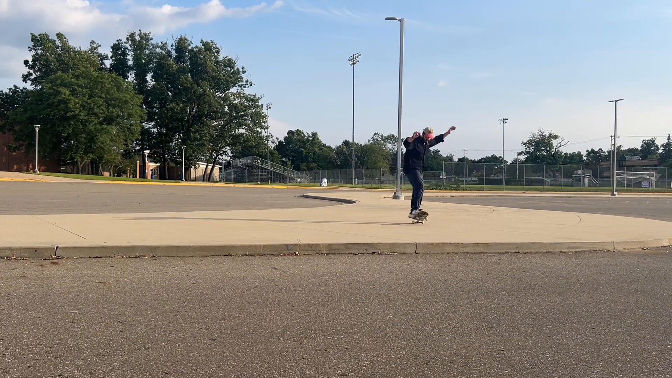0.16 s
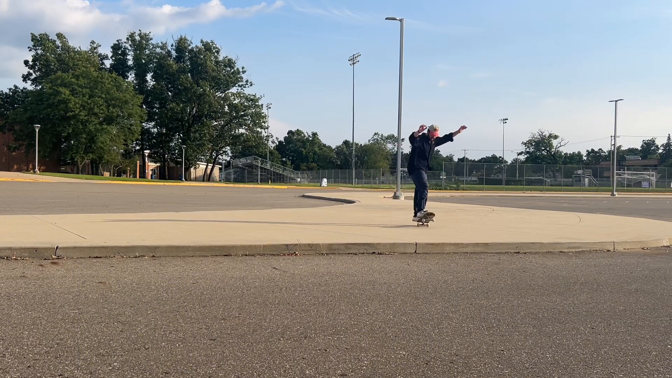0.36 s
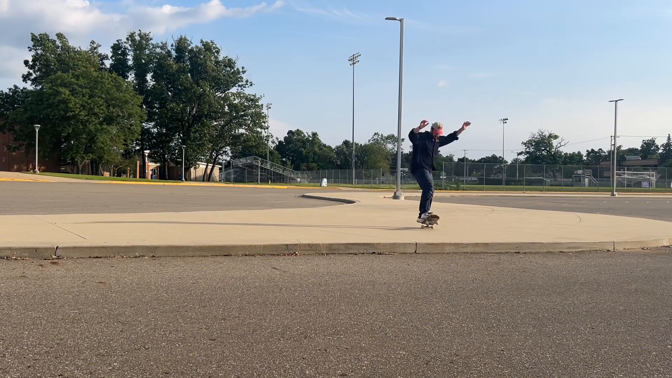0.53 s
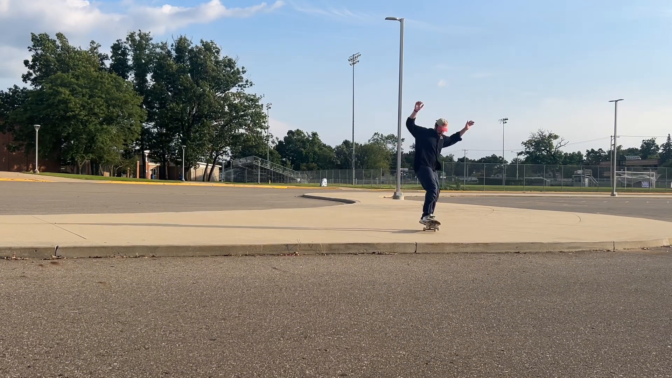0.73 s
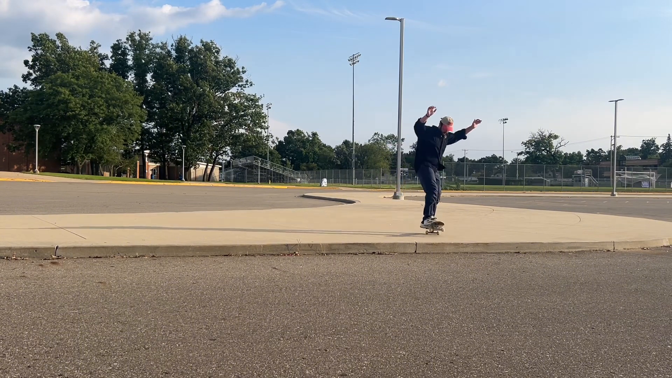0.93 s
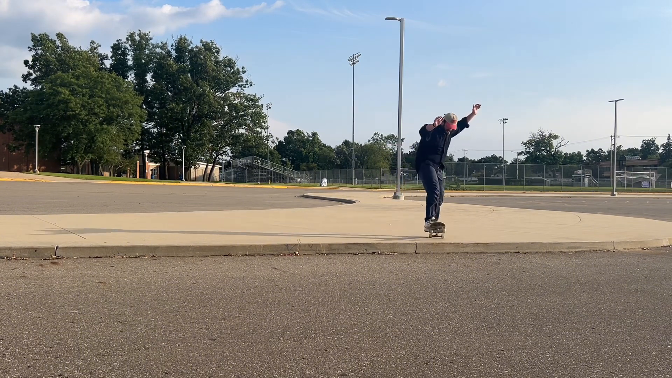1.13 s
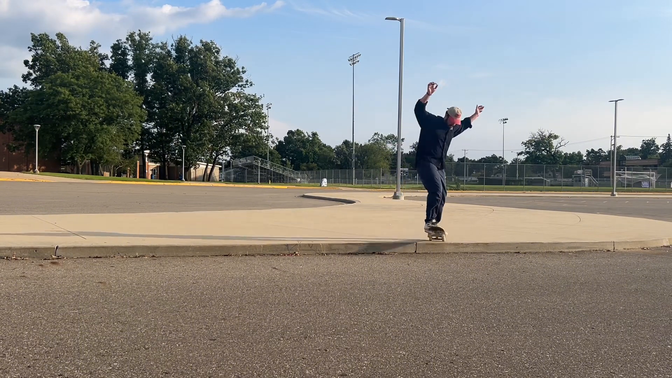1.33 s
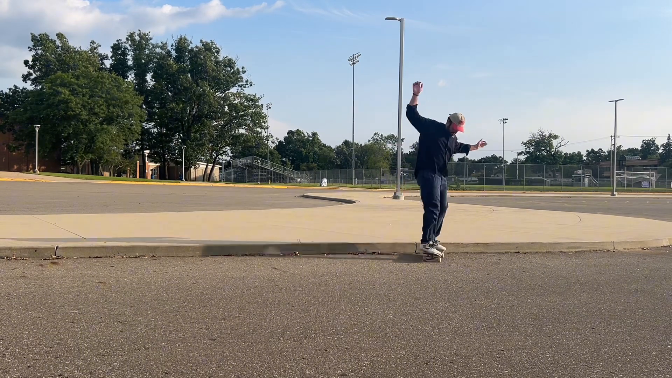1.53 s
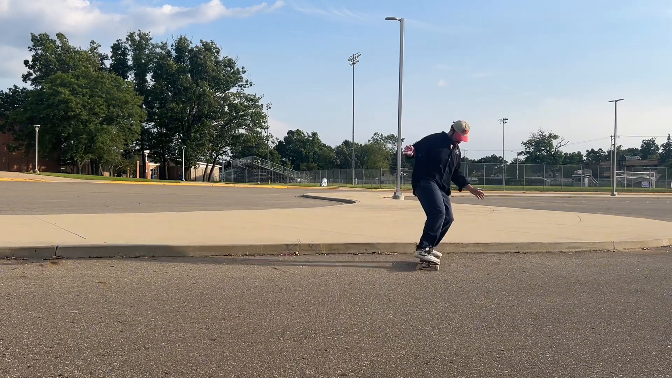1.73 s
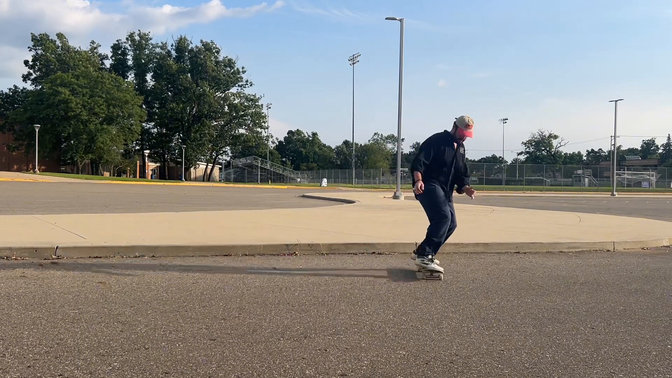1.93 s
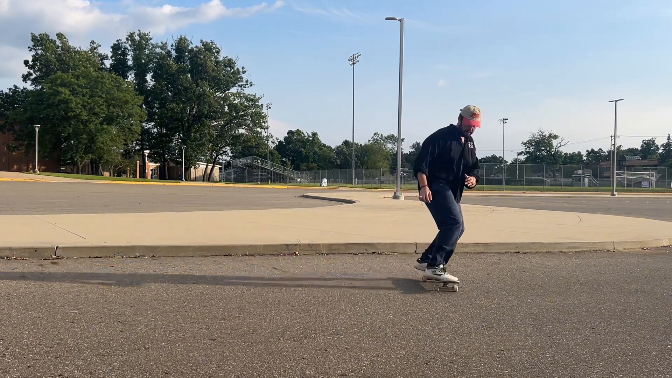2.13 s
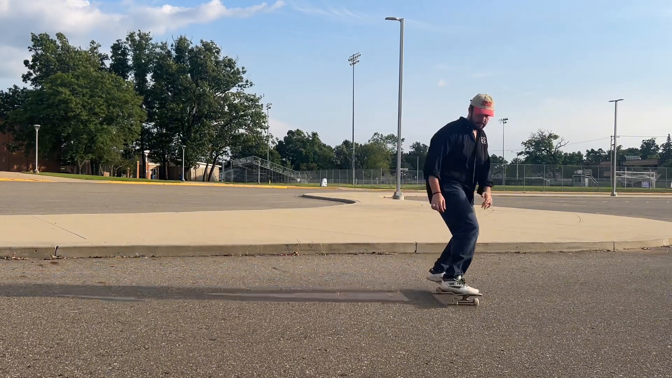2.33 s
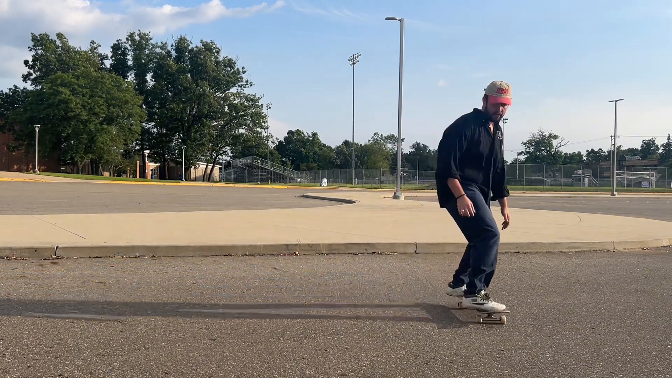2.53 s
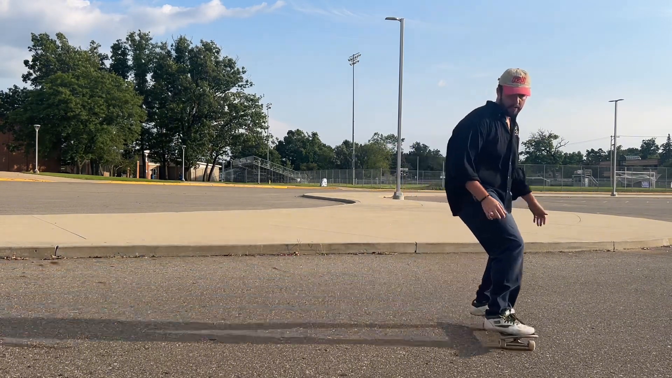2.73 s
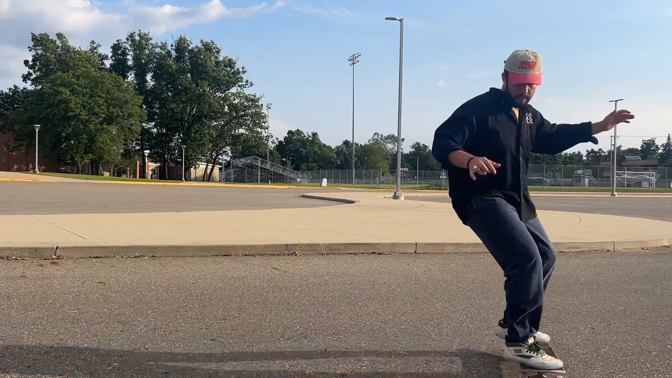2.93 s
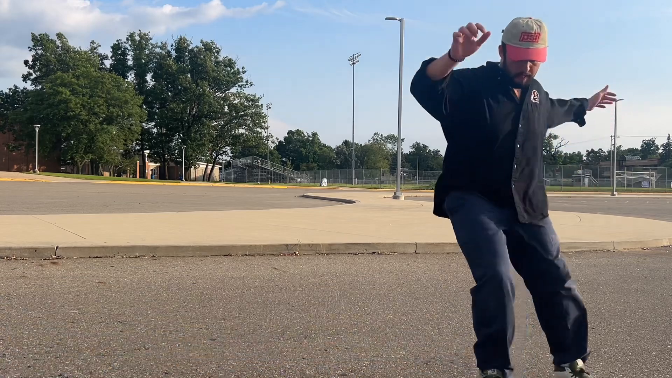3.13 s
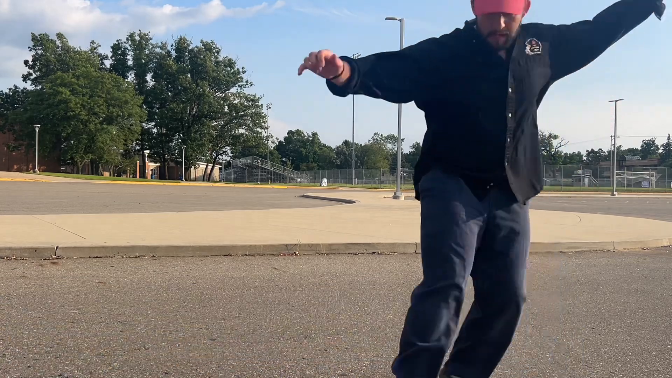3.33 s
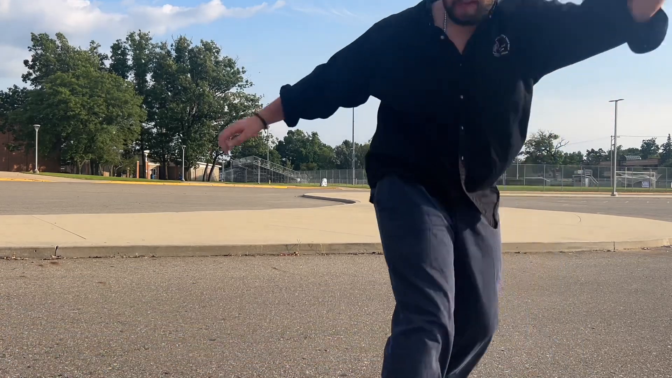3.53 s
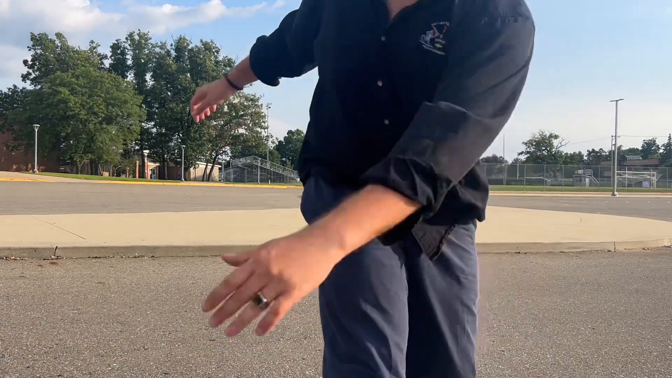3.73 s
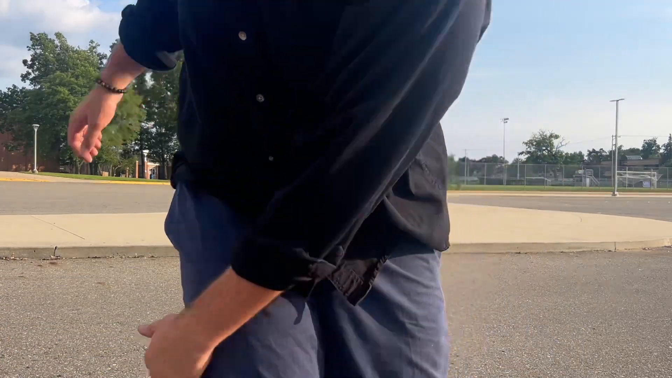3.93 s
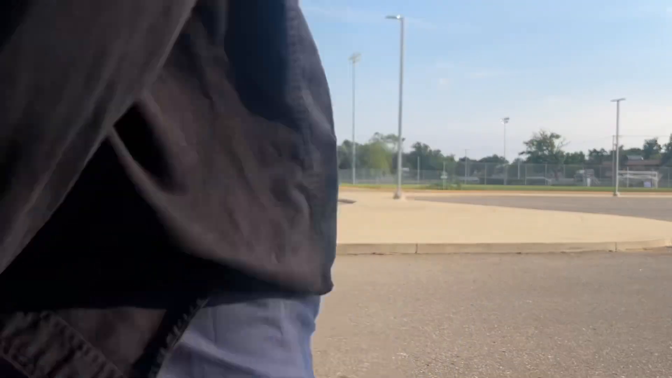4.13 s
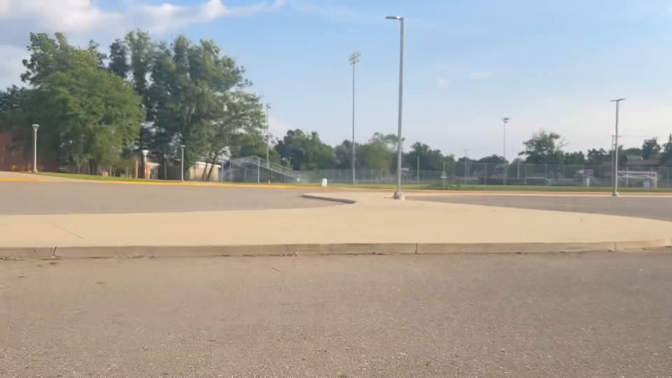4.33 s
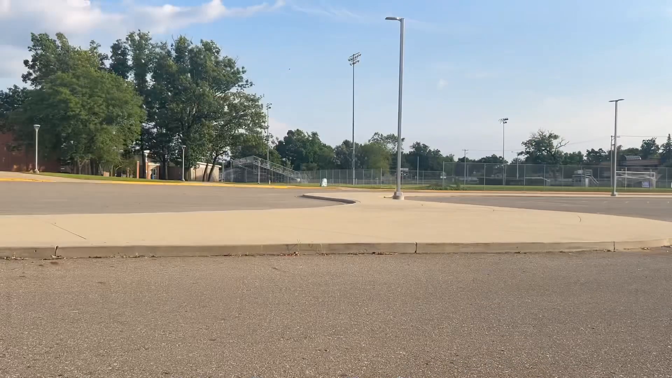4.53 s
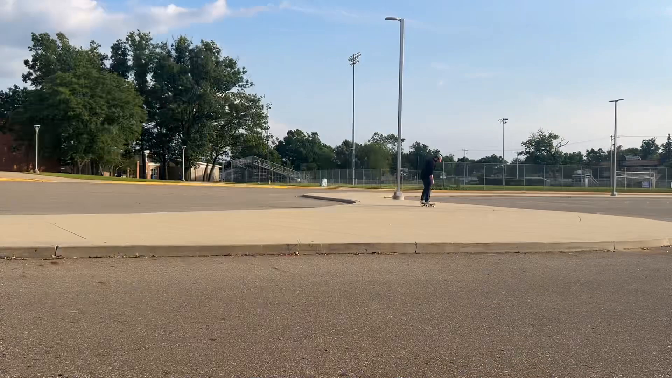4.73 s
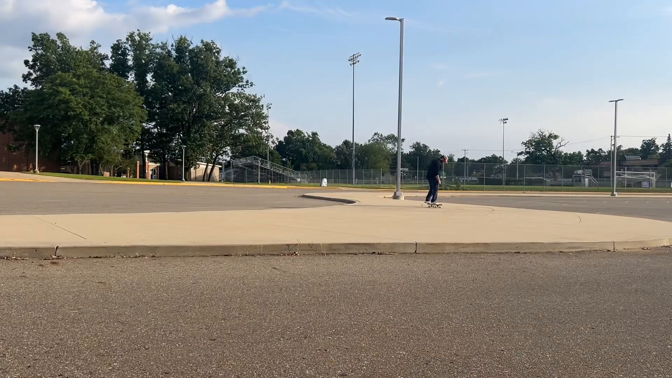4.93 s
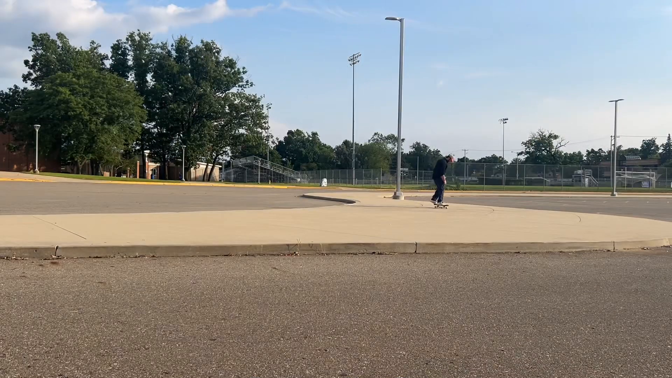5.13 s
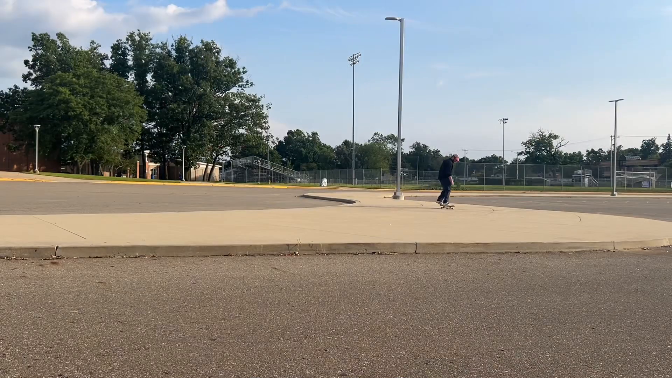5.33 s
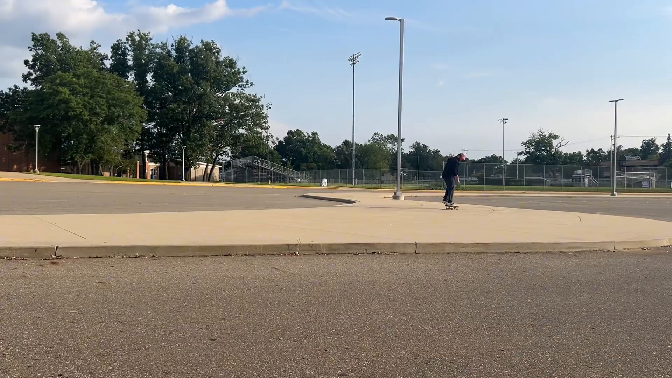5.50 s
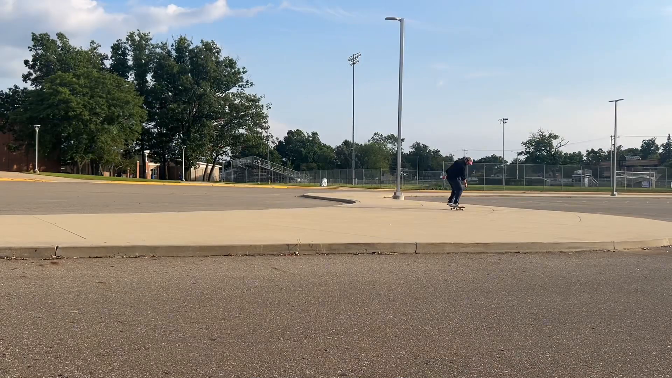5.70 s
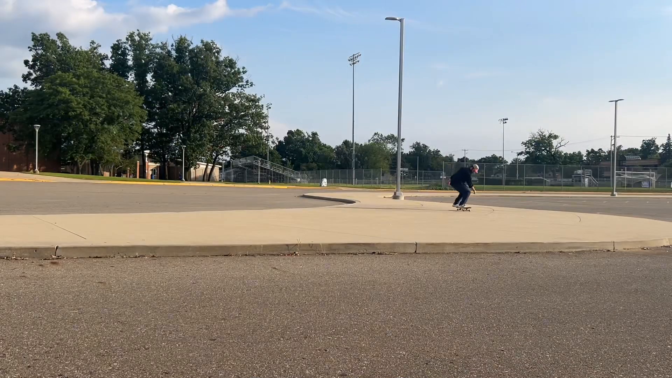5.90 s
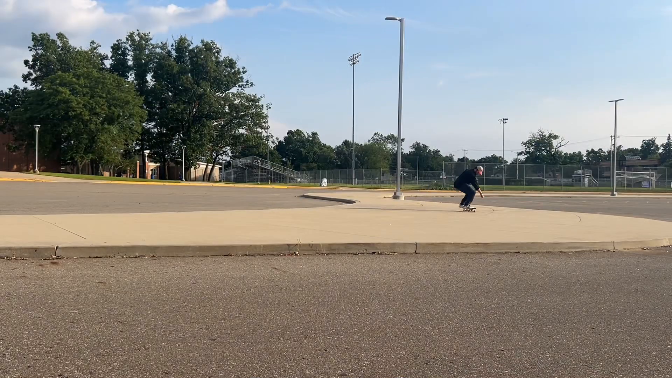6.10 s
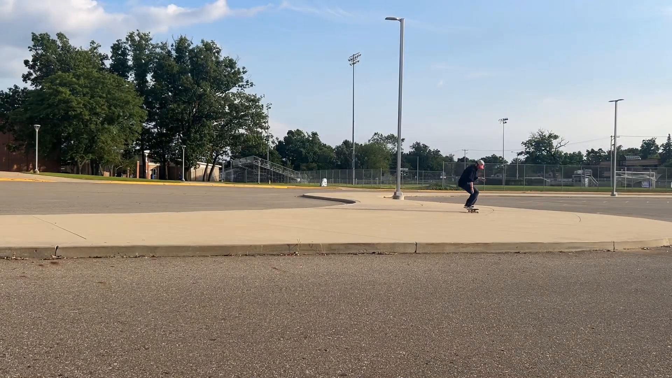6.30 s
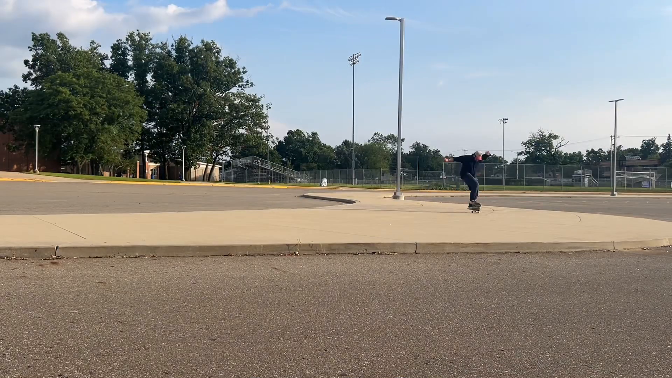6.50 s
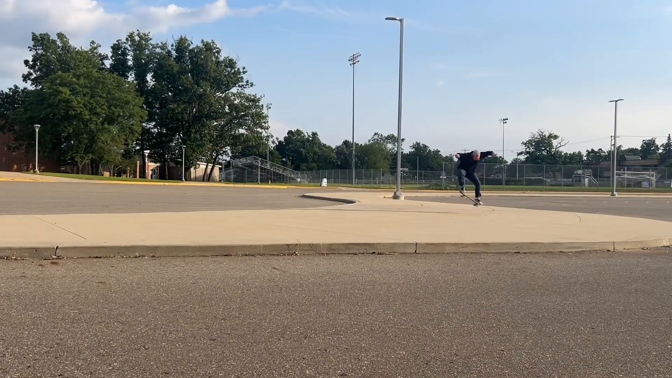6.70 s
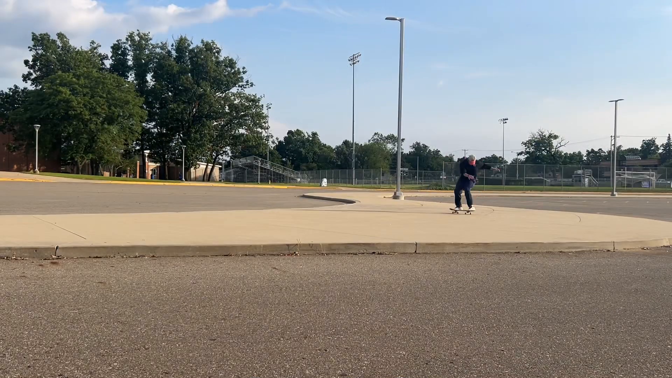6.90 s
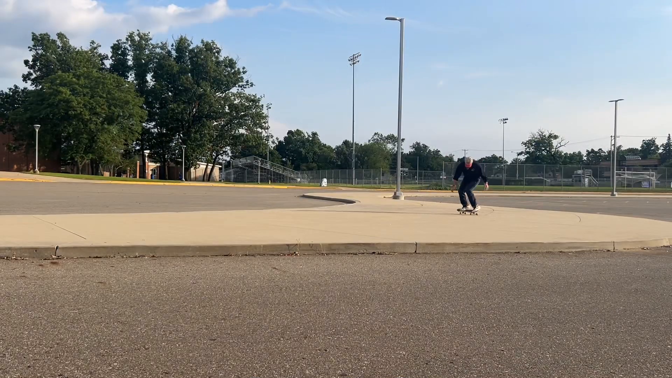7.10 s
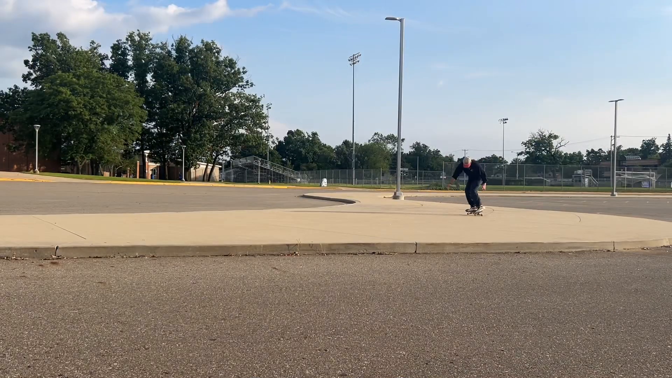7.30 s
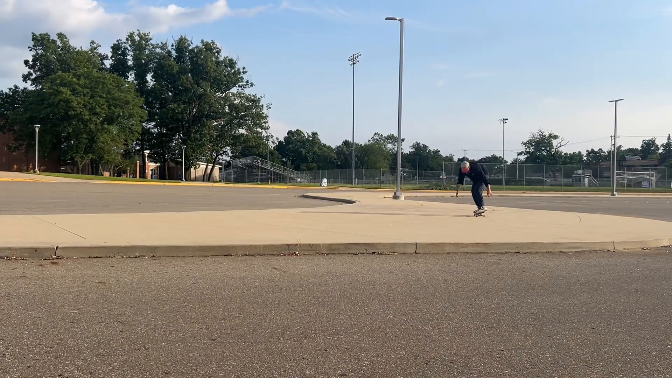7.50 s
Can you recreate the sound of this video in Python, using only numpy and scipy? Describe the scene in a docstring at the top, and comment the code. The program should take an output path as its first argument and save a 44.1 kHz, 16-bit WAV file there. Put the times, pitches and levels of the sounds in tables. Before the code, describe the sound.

An open car park with distant traffic hum, very faint insects and low gusts buffeting a fixed stereo microphone. From 0 s a skateboard rolls closer, a soft rumble with gritty hiss and dull thuds near 0.9 s. At about 1.5 s it drops off a kerb: a hard, hollow wooden crack in a tight cluster, with grinding grit. The rumble roughens and grows. From 2.94 to 3.19 s the wheels skid sideways, a harsh throbbing scrape with an unsteady squeal. Scuffs and board knocks follow at 3.2-3.45 s. Wheels swell to a deep, close rumble peaking around 4.2 s, with rustling, snapping cloth and tiny rattles. At 4.57 s a click cuts the close ride. Faint distant rolling remains under light wind; a wooden pop comes at 6.55 s, a stronger clattering landing at 6.83 s, then small ticks and quiet rolling until about 7.5 s.

```python
"""Throughout, wind buffets two microphone ports over a far traffic hum and a thin band of insects: shaped
noise. A skateboard rolls up over a car park (rumble and hiss), drops off a kerb (struck deck modes, grinding
grit) and skids sideways to brake (stick-slip partials, throbbing scrape). Shoes and tail scuff, then it rumbles
past, the rider's clothes rustling and snapping, until the scene cuts with a click to a far ride: it rolls,
pops, lands."""
import sys
import numpy as np
from scipy import signal
from scipy.fft import rfft, irfft, next_fast_len
from scipy.io import wavfile

SR = 44100
rng = np.random.default_rng(int(sys.argv[2]) if len(sys.argv) > 2 else 0)


def digitize_waveform(pressure):
    """Quantize a signal to 16-bit integers and store it at the path in sys.argv[1].

    Rows of a 2-D input are taken as channels; values are limited to [-1, 1].
    """
    field = np.atleast_2d(pressure).T
    bounded = np.clip(field, -1, 1)
    quanta = np.round(bounded * 32767).astype(np.int16)
    wavfile.write(sys.argv[1], SR, quanta)


N = 332955
SIZE = next_fast_len(N + 4096)
BINS = np.maximum(np.arange(SIZE // 2 + 1) * SR / SIZE, 1)  # Hz

# port pair, source ahead: (frequency [Hz], right lead [rad], left-right [dB], likeness [0-1])
AHEAD_PORTS = [(102.5, -0.49, 0, 0.73), (500, 1, 0.5, 1), (800, 0.6, -4.5, 0.82), (1560, 0.57, -0.5, 1),
               (1940, 0.086, 0.5, 1), (4370, 1, 0.5, 1), (5800, 1.4, 5, 0.41), (7530, 0.88, 3, 0.25)]
# port pair, source beside: (frequency [Hz], right lead [rad], left-right [dB], likeness [0-1])
BESIDE_PORTS = [(100, -.3, 0, .92), (500, -.9, 0, .88), (1000, -1.7, 1, .65), (1450, -3.2, 0, .7),
                (1850, -6.5, 0, .8), (3000, -7.4, 4, .6), (5000, -6.9, 1, .5), (6000, -5.6, 1, .5),
                (7500, -6.28, 0, .8)]
# bright part of a scrape: (frequency [Hz], level [dB])
BRIGHT_SCRAPE = [(1500, -11), (2300, -4.5), (3000, -5), (4200, -7.5), (6000, -5.5), (7500, -14),
                 (9500, -12.5), (12000, -9), (15000, -15)]
LEVEL_FROM_S, LEVEL_AT_S, GONE_S = 3.55, 3.97, 4.5743  # board draws level; the scene cuts to the far ride


def amp(db):
    """Decibels to gain."""
    return 10 ** (np.asarray(db) / 20)


def rms_one(x):
    """Scale to unit power."""
    return x / np.sqrt(np.mean(x ** 2) + 1e-20)


def in_time(rows):
    """Columns joined by straight lines; -200 outside the rows."""
    s, *columns = np.transpose(rows)
    return [np.interp(np.arange(N) / SR, s, c, -200, -200) for c in columns]


def between(values, start_s, end_s):
    """Glide from the first value to the second."""
    return np.interp(np.arange(N) / SR, [start_s, end_s], values)


def strokes(rows, rise_db_per_s, fall_db_per_s):
    """Level in dB of strokes that rise, hold and fall; the loudest counts."""
    t = np.arange(N) / SR
    levels_db = []
    for s, held_s, db in rows:
        early_s = np.maximum(s - t, 0)
        late_s = np.maximum(t - s - held_s, 0)
        levels_db.append(db - rise_db_per_s * early_s - fall_db_per_s * late_s)
    return np.max(levels_db, axis=0)


def at_hz(points, hz, column=1):
    """Read a table on a log-frequency axis."""
    table = np.array(points)
    return np.interp(np.log(hz), np.log(table[:, 0]), table[:, column])


def drift(rate_hz):
    """Slow chance of unit rms: noise through two equal poles, run at every 40th sample."""
    r = np.exp(-80 * np.pi * rate_hz / SR)
    noise = rng.standard_normal(N // 40 + 2002)
    slow = signal.lfilter([1], [1, -2 * r, r * r], noise)[2000:]  # settled part
    return np.interp(np.arange(N) / 40, np.arange(len(slow)), rms_one(slow))


def ring(force, hz, t60_s):
    """One decaying mode: a two-pole resonator."""
    r, w = amp(-60 / (t60_s * SR)), 2 * np.pi * hz / SR
    return signal.lfilter([0, np.sin(w)], [1, -2 * r * np.cos(w), r * r], force + 1e-18)


def rough_noise(flicker_db, rate_hz):
    """Two unrelated white noises that share a flickering level."""
    return rng.standard_normal((2, N)) * amp(flicker_db * drift(rate_hz))


def ports(pair, direction, gain=1):
    """Colour and place a sound: row one reaches both ports alike, row two makes them differ."""
    # high treble, same for every direction: (frequency [Hz], right lead [rad])
    treble_turn = [(7500, 0), (8600, 1.3), (9200, 3), (10700, 3.2), (11500, 5.2), (12400, 6.2),
                   (13900, 6.4), (15000, 9.4)]
    common, apart = rfft(pair, SIZE) * gain
    high = np.interp(BINS, [7500, 9200], [0, 1])
    last_rad = np.angle(np.exp(1j * direction[-1][1]))
    lead_rad = at_hz(direction, BINS) - last_rad * high + at_hz(treble_turn, BINS)
    lean = amp(at_hz(direction, BINS, column=2) / 2)
    alike = np.clip(at_hz(direction, BINS, column=3), 0, 1)
    alike = alike + high * (.995 - alike)
    shared, unlike = np.sqrt(1 + alike) * common, np.sqrt(1 - alike) * apart
    left = lean * (shared + unlike)
    right = (shared - unlike) * np.exp(1j * lead_rad) / lean
    return irfft(np.array([left, right]), SIZE)[:, :N] / np.sqrt(2)


def coloured(spectrum, direction, flicker_db, rate_hz, lift_db=0):
    """Placed noise of a given spectrum; the mean of the two ports has rms 1."""
    gain = amp(at_hz(spectrum, BINS) + lift_db)
    out = ports(rough_noise(flicker_db, rate_hz), direction, gain)
    return out / np.sqrt(np.mean(out.mean(axis=0) ** 2))


def distance():
    """Far traffic is smooth broadband noise; insects are noise through a narrow resonance."""
    # traffic: (frequency [Hz], level [dB])
    traffic_spectrum = [(30, -12.5), (60, -1.5), (150, -5.5), (300, -1.5), (450, -11), (700, -15.5),
                        (1000, -15.5), (1600, -18.5), (2200, -33), (3500, -36.5), (5500, -42), (7000, -47),
                        (9500, -53), (12500, -66), (15000, -68)]
    # port pair, sound from around: (frequency [Hz], right lead [rad], left-right [dB], likeness [0-1])
    around_ports = [(98, 1, 0.5, 1), (507, -0.14, 0, 0.47), (690, -3, 6.5, 0.0463), (797, -4.5, 4, 0.2),
                    (1520, -2.5, -2, 0.71), (1785, -6, 3.5, 0.88), (3350, -7.5, 1, 0.83),
                    (5400, 0, 4, 0.15), (7530, 4.5, -1.5, 0.25)]
    insects = rms_one(ring(rng.standard_normal(N), hz=6600, t60_s=0.005))
    traffic = coloured(traffic_spectrum, around_ports, flicker_db=.6, rate_hz=2.3)
    return amp(-45.5) * traffic + amp(-79.5) * insects * [[1.2], [.8]]


def wind():
    """Turbulence on the ports: lumpy low-frequency pressure noise."""
    # gusts: (time [s], level [dB])
    gusts = [(0.0, -32), (0.36, -31.5), (0.4, -31), (0.8, -29.5), (0.84, -35.5), (0.92, -25.5), (1.2, -31),
             (1.28, -29), (1.45, -30), (1.68, -25.5), (1.81, -29), (2.02, -26.5), (2.1, -31.5),
             (2.29, -29.5), (2.39, -42), (2.59, -37.5), (2.61, -42.5), (3.05, -34), (3.07, -63),
             (3.36, -64), (3.47, -28.5), (3.51, -43), (4.25, -42), (4.31, -50), (4.37, -29), (4.42, -33),
             (4.44, -24.5), (4.52, -41), (5.3, -53.5), (5.59, -38), (5.66, -42.5), (6.03, -37.5),
             (6.06, -45), (6.58, -37.5), (6.6, -41), (6.86, -46.5), (6.88, -37), (7.25, -40), (7.3, -35),
             (7.55, -43.5)]
    # gust spectrum: (frequency [Hz], level [dB])
    gust_spectrum = [(20, -27.5), (35, -1.5), (60, 5.5), (100, 2), (160, -3), (250, -8.5), (400, -25.5),
                     (800, -65)]
    return amp(in_time(gusts)[0]) * coloured(gust_spectrum, AHEAD_PORTS, flicker_db=2.5, rate_hz=20.)


def clothes():
    """Cloth rubs in clumps of noise; creases and grit snap in short bursts."""
    # rubs: (time [s], held [s], level [dB])
    rubs = [(0.02, 0.012, -75), (0.29, 0.061, -70), (0.9, .01, -73), (0.95, .19, -79), (1.4, .05, -78),
            (3.9, .65, -81), (4.03, 0.055, -54), (4.134, 0.0044, -60), (4.195, 0.055, -49.5),
            (4.29, 0.092, -68)]
    # louder snaps: (time [s], level [dB])
    loud_snaps = [(2.833, -36.5), (3.2484, -31.5), (3.2842, -44.5), (3.344, -40), (3.361, -34),
                  (3.3866, -35.5), (3.3972, -41), (3.423, -41.5), (3.433, -41), (3.4448, -37.5),
                  (3.927, -48), (4.019, -41), (4.025, -46), (4.0302, -29.5), (4.035, -33), (4.044, -38),
                  (4.049, -37), (4.0594, -37), (4.073, -33.5), (4.077, -41), (4.085, -32), (4.1238, -46),
                  (4.1333, -31), (4.1523, -42), (4.174, -41), (4.188, -42), (4.202, -32), (4.2138, -48),
                  (4.221, -42), (4.2305, -32), (4.245, -41), (4.2494, -36), (4.2911, -42), (4.3037, -51),
                  (4.31, -43), (4.3187, -33), (4.351, -44), (4.371, -42), (4.394, -39.5)]
    # cloth spectrum: (frequency [Hz], level [dB])
    cloth_spectrum = [(3000, -1.5), (4500, -27), (6000, 8.5), (7500, 1.5), (9500, 13.5), (12500, 2.5),
                      (15000, -2.5)]
    faint_from_s, faint_to_s, faint_db, faint_spread_db = 3.7, 4, -64, -1
    snap_rise_s, snap_fall_s = .0016, .0017

    rub_db = strokes(rubs, rise_db_per_s=497, fall_db_per_s=901)
    rub = amp(rub_db) * rough_noise(flicker_db=3.5, rate_hz=180.0)
    faint_snaps = []  # at random times
    for a, b in rng.random(size=(14, 2)):
        s = faint_from_s + a * (faint_to_s - faint_from_s)
        faint_snaps.append((s, faint_db + faint_spread_db * (2 * b - 1)))
    t = np.arange(440) / SR
    burst = np.minimum(t / snap_rise_s, 1) * np.exp(-t / snap_fall_s)
    snaps = np.zeros((2, N))
    for s, db in loud_snaps + faint_snaps:
        at = round(s * SR)
        snaps[0, at:at + 440] += amp(db) * rng.standard_normal(440) * burst

    cloth_db = at_hz(cloth_spectrum, BINS)
    octaves_below = np.maximum(np.log2(cloth_spectrum[0][0] / BINS), 0)
    rub_gain = amp(cloth_db - 8. * octaves_below)
    snap_gain = amp(3.0 + 0.45 * cloth_db - 3. * octaves_below)
    return ports(rub, BESIDE_PORTS, rub_gain) + ports(snaps, BESIDE_PORTS, snap_gain)


def thuds():
    """Wheel thuds and gust slaps: a soft push, a low ring that falls 60 dB in 4.25 cycles."""
    # pushes: (time [s], drive [dB], frequency [Hz])
    pushes = [(0.917, -9.5, 72), (0.967, -9.5, 68), (1.263, -13, 74), (1.498, -7.5, 298), (1.522, -6, 330),
              (1.534, -13, 111), (1.631, -10, 250), (1.652, -10.5, 211), (1.656, -5.5, 310),
              (1.666, -5.5, 53.7), (2.805, -9.5, 163.4), (2.904, -15, 199), (3.449, -13.5, 204),
              (4.436, -18.5, 100), (6.883, -18.5, 130), (7.013, -16, 194)]
    out = np.zeros(N)
    for s, db, hz in pushes:
        push = np.zeros(4096)
        push[0] = amp(db)
        soft = signal.lfilter([.05], [1, -.95], -ring(push, hz, 4.25 / hz))
        at = round(s * SR)
        out[at:at + 4096] += soft
    return out * np.ones((2, 1))


def scuffing():
    """Shoes and tail scuff the ground: strokes of bright, uneven scrape noise."""
    # scuffs: (time [s], held [s], level [dB])
    scuffs = [(3.18, 0.084, -49.5), (3.38, 0.0038, -34.5), (3.446, .002, -53)]
    scuff_db = strokes(scuffs, rise_db_per_s=429, fall_db_per_s=500)
    return amp(scuff_db) * coloured(BRIGHT_SCRAPE, AHEAD_PORTS, flicker_db=6.0, rate_hz=180.0)


def blows():
    """Each contact knocks the deck modes near the spot struck, then grinds briefly and keeps them shaking."""
    # board on ground: (time [s], grit level [dB], grind [s], grit tilt [dB/octave], knock level [dB],
    # centre of the deck's ring [Hz])
    contacts = [(1.488, -18, 0.0089, -3, -19, 3100), (1.4905, -35, .002, 10, -25, 3500),
                (1.4908, -33, 0.004, 6, -13.5, 1000), (1.494, -36, 0.0023, 4, -28, 3300),
                (1.498, -32, 0.016, -3.5, -18, 800), (1.5154, -21, 0.005, -1.5, -5.5, 1300),
                (1.5178, -26.5, 0.0018, 5, -27, 4600), (1.517, -40, 0.0018, 1, -12.5, 1290),
                (1.518, -29, 0.0091, -5.5, -12.5, 2800), (1.522, -48, 0.0068, -9, -14.5, 596),
                (1.541, -42, .006, 7, -16, 544), (1.528, -44, 0.016, -2.5, -33, 2100),
                (1.545, -48, .003, -7, -29, 2050), (1.555, -44, 0.025, -6, -35, 1500),
                (1.718, -63, .003, -5, -39, 2200), (3.253, -30, 0.0072, -4, -21.5, 1305),
                (3.383, -29.5, .015, -4.5, -33.5, 1120), (3.449, -34.5, 0.0037, -0.7, -19.5, 596),
                (3.735, -60, .003, 2, -48, 4240), (3.83, -63, 0.017, 2, -43, 3130),
                (3.927, -46.5, .002, 1.5, -48, 2260), (3.995, -63, .003, -5, -39.5, 2200),
                (4.022, -49, 0.0082, 5, -40, 2080), (4.034, -53, .003, -2, -46, 4270),
                (4.1335, -57, .003, -1, -44, 2400), (4.135, -58, .003, 2, -40, 4440),
                (4.176, -62, .003, 2, -49, 4260), (4.2022, -58, .003, 0, -40, 2300),
                (4.249, -60, .003, 3, -47, 4300), (4.286, -66, .004, -2, -41, 1750),
                (4.331, -64, .003, 0, -43, 1650), (4.418, -60, .003, -3, -23, 600),
                (4.431, -60, .003, 8, -45, 1820), (4.472, -60, .003, -3, -29, 600),
                (4.836, -52, .002, -2, -59, 4240), (6.526, -53, .018, -0.5, -55, 2500),
                (6.546, -28, 0.01, -0.7, -14.5, 1140), (6.5451, -37, 0.014, 3, -28, 3900),
                (6.549, -49, .005, -10, -21.5, 2300), (6.554, -38, 0.0033, -12, -26, 580),
                (6.564, -54.5, .038, 2, -37, 3620), (6.822, -32, 0.0097, 5.5, -25, 2500),
                (6.823, -49, .002, 8, -25, 600), (6.825, -32, 0.0083, 8, -14, 800),
                (6.828, -47, .002, 0, -22, 1730), (6.833, -51, .002, 0, -28, 2400),
                (6.825, -23, 0.0023, 0, -32, 3800), (6.8307, -28, 0.0078, 6.5, -6.5, 614),
                (6.8372, -50, 0.0036, -16, -11.5, 560), (6.837, -38, .002, 27, -19, 1470),
                (6.85, -31.5, 0.018, 5.5, -17, 760), (6.8566, -40, 0.0034, -11, -20, 760),
                (6.856, -48, .002, 3, -34, 2100), (6.8625, -45.5, 0.011, 0, -22, 756),
                (7.056, -47, 0.017, -6.5, -48, 3860), (7.071, -57, .004, 2, -49, 1500),
                (7.084, -53, .01, -4, -62, 4000), (7.099, -53, 0.029, 1, -45, 3150),
                (7.099, -66.5, .012, -13, -46, 3900), (7.129, -60, 0.025, 1, -48, 5300),
                (7.318, -65, .004, 0, -59, 3800), (7.355, -66, .004, 0, -55, 4000)]
    # deck modes: (frequency [Hz], level [dB], t60 [s])
    deck_modes = [(544, 10.5, 0.022), (623, -0.5, 0.034), (710, 1, 0.044), (1008, -7.5, 0.021),
                  (1323, 3, 0.01), (1483, -2.5, 0.022), (1730, 4, 0.012), (2050, 4, .02), (2260, 11, 0.014),
                  (2800, -22, .012), (3150, 9, 0.0091), (3600, 4, 0.025), (3860, 7, 0.021),
                  (4070, 4, 0.048), (4600, 0.5, 0.024), (5300, -6, 0.012)]
    # grit spectrum at a contact: (frequency [Hz], level [dB])
    crack_spectrum = [(150, -40), (400, -3.5), (800, -6), (1300, -3), (2000, -6.5), (3500, -11),
                      (4800, -19.5), (6500, -21.5), (9500, -25), (12500, -33.5), (15000, -32)]
    grind_t60_s, settle_t60_s, settle_db = 0.028, 0.17, -12  # grit stops fast, a faint rattle settles slowly
    size = 8192

    out, t = np.zeros((2, N)), np.arange(size) / SR
    hz = np.maximum(np.arange(size // 2 + 1) * SR / size, 1)
    for s, grit_db, grind_s, tilt_db, knock_db, ring_hz in contacts:
        noise = rng.standard_normal((2, size))
        rise = np.minimum(t / .002, 1)
        grinding = amp(-60 * np.maximum(t - grind_s, 0) / grind_t60_s)
        settling = amp(settle_db - 60 * t / settle_t60_s)
        lumps = rms_one(signal.lfilter([1], [1, -.985], rng.standard_normal(size)))
        shape = rise * (grinding + settling) * amp(3 * lumps - 1)  # grit comes in lumps
        grit_gain = amp(at_hz(crack_spectrum, hz) + tilt_db * np.log2(hz / 1000))
        grit = rms_one(irfft(rfft(noise) * grit_gain))

        spread_octaves = 0.45 * min(1000 / ring_hz, 1) ** .4  # higher knocks wake fewer modes
        play_db = rng.standard_normal(len(deck_modes))  # no two contacts alike
        force = .009 * noise * shape
        force[0, 44] += 1  # knock, 1 ms into the contact
        deck = 0
        for k, (mode_hz, mode_db, t60_s) in enumerate(deck_modes):
            off_centre = np.log2(mode_hz / ring_hz) / spread_octaves
            gain = amp(mode_db - 11.0 * off_centre ** 2 + play_db[k])
            deck = deck + gain * (-1) ** k * ring(force, mode_hz, t60_s)
        knock = amp(knock_db) * deck / np.max(np.abs(deck))
        at = round(s * SR)
        out[:, at:at + size] += amp(grit_db) * grit * shape + knock

    t = np.arange(N) / SR
    beside = (t > (LEVEL_FROM_S + LEVEL_AT_S) / 2) & (t < GONE_S)  # trucks rattling as the board passes
    return ports(out * ~beside, AHEAD_PORTS) + ports(out * beside, BESIDE_PORTS)


def skid():
    """Wheels dragged sideways stick and slip: unsteady partials and a scrape that throbs with each slip.
    A moving resonance lifts the partials near it and whistles in the scrape as the board turns."""
    # drag: (time [s], stick-slip [Hz], upper partials [dB], pressure on the scrape [dB],
    # first partial [dB], second partial [dB], third partial [dB])
    drag = [(2.935, 288.6, -48, -20.5, -52, -42.5, -36), (2.95, 299.8, -34, -5.5, -51, -34, -34),
            (2.97, 301.8, -20.5, -0.5, -39, -25, -23), (2.99, 312.9, -20, 1, -29.5, -22, -21),
            (3.015, 312, -20.5, 0, -41, -12, -23.5), (3.035, 321.4, -18.5, 4, -28.5, -15.5, -20),
            (3.055, 310.5, -20, 0, -30, -13.5, -28.5), (3.07, 325, -19, 5.5, -33, -13, -29),
            (3.085, 325.6, -16, 2, -23.5, -16, -17), (3.104, 316.5, -19, 3, -17, -17.5, -22),
            (3.12, 307, -16.5, -0.5, -20, -28.5, -22.5), (3.14, 320, -18.5, 1, -30.5, -21, -26),
            (3.166, 303, -21.5, -4, -20, -31.5, -35.5), (3.19, 302, -48, -38, -48, -46, -55)]
    # upper partials: (multiple of stick-slip [-], level [dB])
    upper_partials = [(4, -11.5), (5, -16.5), (6, -17.5), (7, -18.5), (8, -29.5), (9, -21.5), (10, -18),
                      (11, -19), (12, -24.5)]
    # resonance: (time [s], frequency [Hz])
    resonance = [(2.93, 1550), (2.955, 1650), (2.975, 1850), (3.0, 1650), (3.02, 1880), (3.05, 1950),
                 (3.065, 2900), (3.09, 2800), (3.115, 3200), (3.135, 2700), (3.155, 2000), (3.19, 1900)]
    # coarse scrape: (frequency [Hz], level [dB])
    coarse_spectrum = [(200, -17.5), (500, -3.5), (900, -2), (1400, -1), (1900, -4.5), (2400, -9),
                       (3200, -17.5), (5000, -36)]
    # port pair, source at the right: (frequency [Hz], right lead [rad], left-right [dB], likeness [0-1])
    right_ports = [(100, 0.17, 1.5, 0.84), (495, 0.53, -1, 0.98), (900, 0.67, -5, 0.39),
                   (1600, 0.84, -5, 0.85), (1900, 0., 0, 1), (3500, 0.09, 10.5, 0.57), (5460, 0., 0.5, 1),
                   (7500, .1, -2, 0.99)]
    turn_from_s, turn_to_s = 3.05, 3.08

    slip_hz, squeal_db, drag_db, *lowest_db = in_time(drag)
    slip_hz = np.maximum(slip_hz, 1)
    peak_hz = np.maximum(in_time(resonance)[0], 1)
    coarse_db = between((-24, -28.5), turn_from_s, turn_to_s) + drag_db
    bright_db = between((-28, -25), turn_from_s, turn_to_s) + drag_db
    phase = 2 * np.pi * np.cumsum(slip_hz * (1 + 0.01 * drift(29.85))) / SR

    upper = 0
    for k, db in upper_partials:
        patchy_db = 4 * drift(40)  # each comes and goes
        lift_db = 6.5 / (1 + (np.log2(k * slip_hz / peak_hz) / 0.13) ** 2)
        tone = np.sin(k * phase + rng.uniform(0, 2 * np.pi))
        upper = upper + amp(db - 1.5 + patchy_db + lift_db) * tone
    lowest = sum(amp(db) * np.sin(k * phase) for k, db in enumerate(lowest_db, start=1))
    squeal = amp(squeal_db) * upper + lowest

    whistle = drift(100.) * np.sin(2 * np.pi * np.cumsum(peak_hz) / SR)  # noise band around the resonance
    throb = 1 + .4 * np.sin(phase)
    tonal = squeal + amp(coarse_db + 0.8) * whistle * throb
    coarse = coloured(coarse_spectrum, right_ports, flicker_db=0.5, rate_hz=143.0)
    bright = coloured(BRIGHT_SCRAPE, right_ports, flicker_db=0.5, rate_hz=143.0)
    scrape = (amp(coarse_db) * coarse + amp(bright_db) * bright) * throb
    return ports([tonal, 0 * tonal], right_ports) + scrape


def passing_bands():
    """Two narrow bands ring in the hiss as the board comes close: noise on gliding, wandering carriers."""
    # bands: (time [s], lower [Hz], lower level [dB], upper [Hz], upper level [dB])
    bands = [(3.5, 1350, -68, 2700, -75), (3.62, 1342, -48, 2900, -56), (3.75, 1286, -47, 3200, -53),
             (3.85, 1280, -42, 3150, -57), (3.93, 1133, -41, 2900, -62), (4.05, 1010, -48, 2300, -64),
             (4.2, 930, -65, 2300, -56), (4.3, 950, -75, 2200, -77)]
    low_hz, low_db, high_hz, high_db = in_time(bands)
    out = 0
    for hz, db, width_hz in ((low_hz, low_db, 180.), (high_hz, high_db, 300.)):
        noise = drift(width_hz)
        wander = 1 + .06 * drift(12.)
        carrier = np.sin(2 * np.pi * np.cumsum(np.maximum(hz, 0) * wander) / SR)
        out = out + amp(db) * noise * carrier
    return out


def cut_click():
    """The scene cuts to the far ride with a click: one impulse with a fast decay."""
    return signal.lfilter([amp(-28.5)], [1, -.8], np.arange(N) == round(GONE_S * SR))


def rolling():
    """The ground shakes the hollow deck and hisses under the wheels; the board goes from ahead to beside."""
    # near ride to 4.57 s, then the far one: (time [s], deck rumble [dB], grit hiss [dB])
    roll = [(0.0, -47, -56), (0.69, -46, -57), (0.93, -44.5, -51.5), (1.32, -49, -59), (1.55, -41.5, -45.5),
            (2.23, -38, -48), (2.69, -34.5, -45), (2.9, -35, -39.5), (3.27, -34.5, -38.5),
            (3.33, -33.5, -39.5), (3.45, -38.5, -46), (3.67, -33, -43.5), (4.02, -24, -45),
            (4.18, -21, -44.5), (4.25, -22, -50), (4.29, -24.5, -48), (4.42, -28, -52), (4.57, -31.5, -50),
            (4.575, -51.5, -60.5), (5.05, -55, -60), (6.2, -52.5, -60.5), (6.65, -54, -54.5),
            (7.05, -50.5, -58), (7.36, -52, -55), (7.55, -53.5, -60.5)]
    # deck over the ground: (frequency [Hz], width [Hz], lift when beside [dB])
    hollow = [(155, 35, 4), (307, 35, 9), (495, 55, 12), (650, 60, 8)]
    # deck rumble: (frequency [Hz], level [dB])
    rumble_spectrum = [(40, -21), (80, -6.5), (150, 0.5), (300, -0.5), (500, -4.5), (700, -6.5),
                       (900, -17.5), (1300, -21.5), (2000, -51)]
    # grit hiss: (frequency [Hz], level [dB])
    grit_spectrum = [(500, 7), (1000, 3.5), (1500, 1), (1900, -2), (2400, -8), (3300, -13.5), (4300, -16),
                     (5500, -24.5), (7000, -44.5)]
    # fine grit: (frequency [Hz], level [dB])
    fine_spectrum = [(3000, -6.5), (5000, -4.5), (7000, 1), (9500, 4), (12500, -2), (15000, -5.5)]
    # hiss by way of the ground: (time [s], detour [ms], share [0-1])
    ground_path = [(3.2, .72, .05), (3.55, .72, .3), (3.8, .62, .5), (3.91, .73, .4), (3.94, .6, .05),
                   (3.98, .46, .45), (4.22, .43, .45), (4.27, .5, .1), (4.3, .58, .4), (4.57, .56, .3)]

    rumble_db, grit_db = in_time(roll)
    hollow_db = sum(lift_db / (1 + (2 * (BINS - hz) / width_hz) ** 2) for hz, width_hz, lift_db in hollow)
    level = between((0, 1), LEVEL_FROM_S, LEVEL_AT_S)
    angle = level * np.pi / 2
    rumble, grit = 0, 0
    for share, direction, hollowness in ((np.cos(angle), AHEAD_PORTS, .4), (np.sin(angle), BESIDE_PORTS, 1)):
        rumble = rumble + share * coloured(rumble_spectrum, direction, flicker_db=2.0, rate_hz=17.0,
                                           lift_db=hollowness * hollow_db)
        grit = grit + share * coloured(grit_spectrum, direction, flicker_db=1.5, rate_hz=30.)

    detour_ms, share = np.maximum(in_time(ground_path), 0)
    late_at = np.arange(N) - detour_ms * SR / 1000
    late = [np.interp(late_at, np.arange(N), side) for side in grit]
    grit = (grit + share * late) / np.sqrt(1 + share ** 2)  # comb whose teeth move with the board

    fine = coloured(fine_spectrum, BESIDE_PORTS, flicker_db=2.0, rate_hz=40.)
    # grows faster than the hiss; the rider shades it when beside
    fine_db = -68 + 1.7 * (grit_db + 44.5) - 10 * level
    return amp(rumble_db) * rumble + amp(grit_db) * grit + amp(fine_db) * fine


def scene():
    """All sources at the two ports."""
    background = distance() + wind()
    contacts = clothes() + thuds() + scuffing() + blows() + skid()
    return background + contacts + passing_bands() + cut_click() + rolling()


def record(dry):
    """The deepest bass is cut, and the top steeply."""
    thinned = signal.sosfilt(signal.butter(2, 43, "high", fs=SR, output="sos"), dry)
    return signal.sosfilt(signal.cheby2(14, 70, 15800, fs=SR, output="sos"), thinned)


dry = scene()
out = record(dry)
digitize_waveform(out)
```